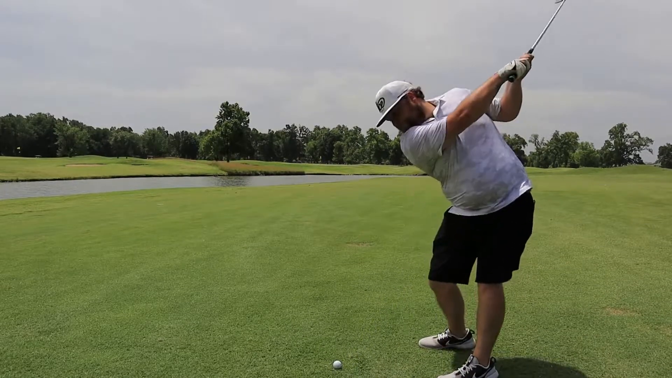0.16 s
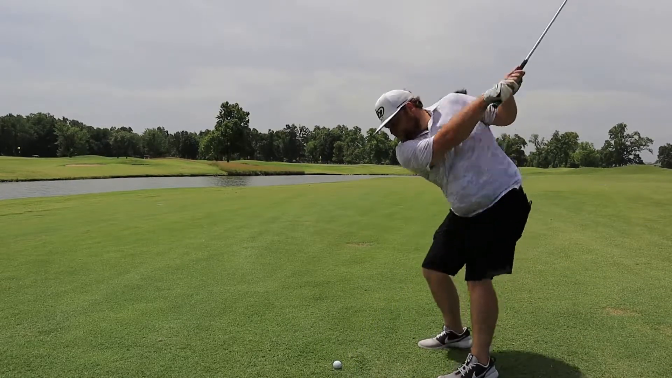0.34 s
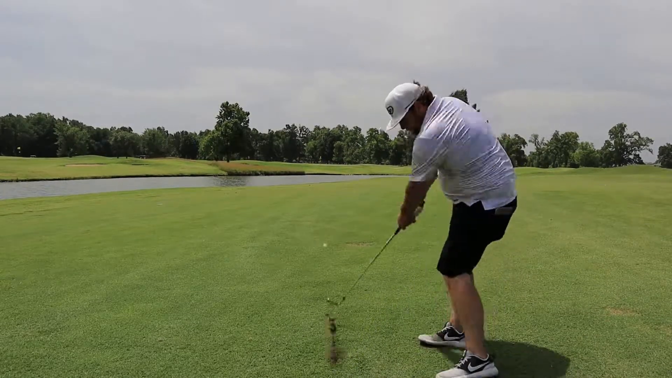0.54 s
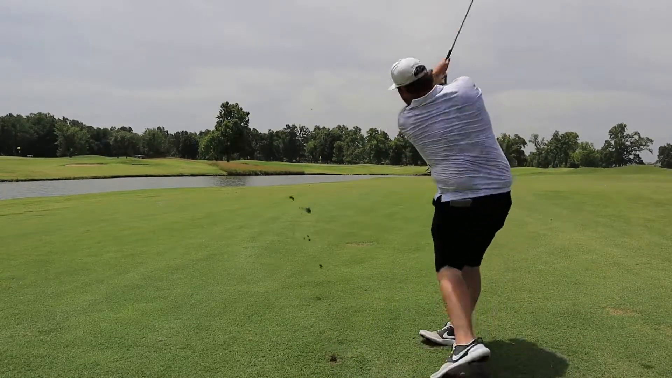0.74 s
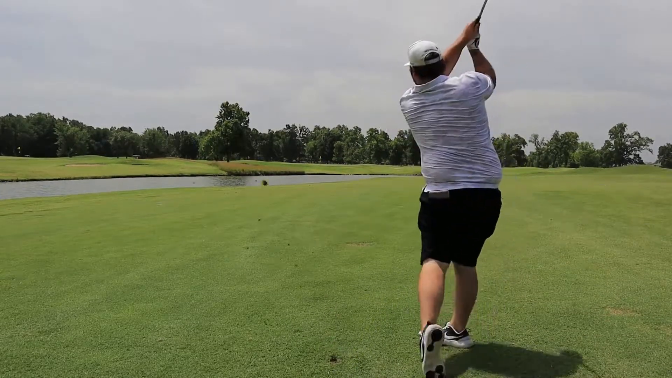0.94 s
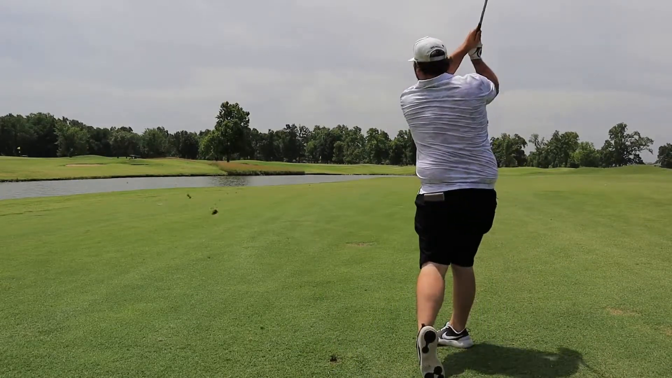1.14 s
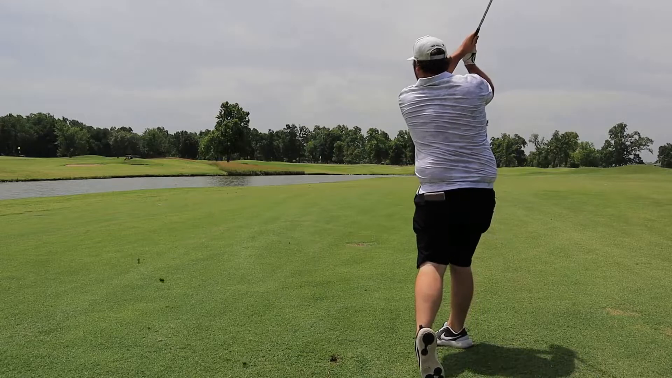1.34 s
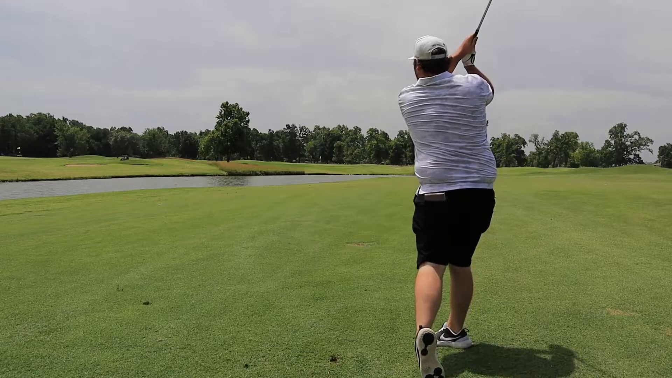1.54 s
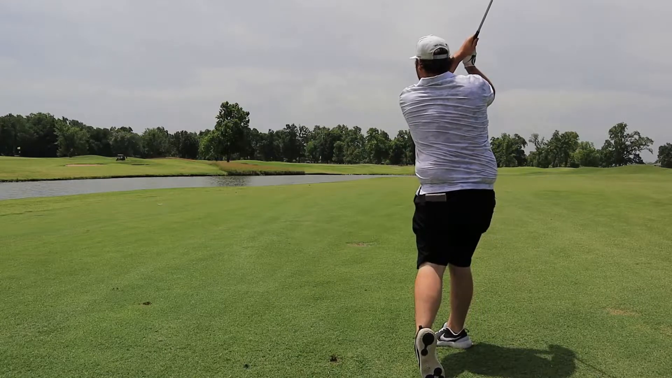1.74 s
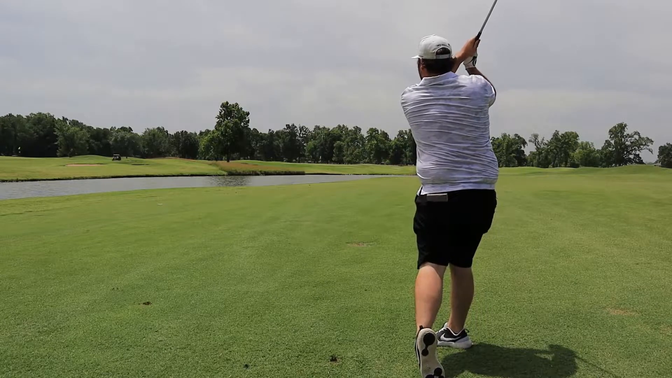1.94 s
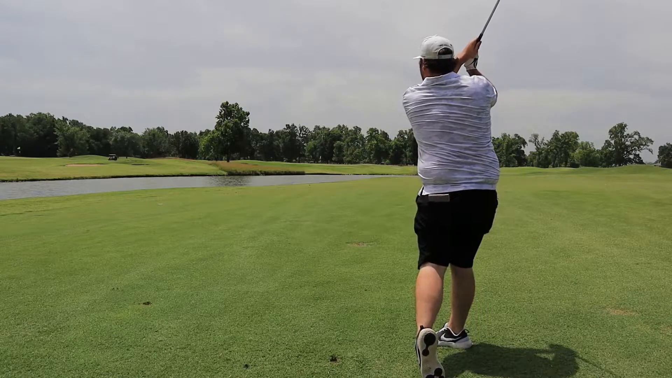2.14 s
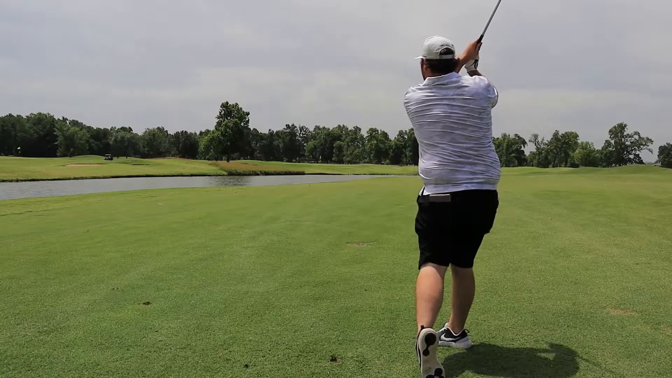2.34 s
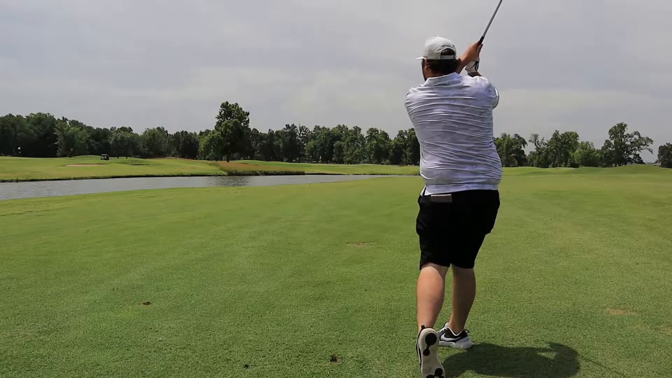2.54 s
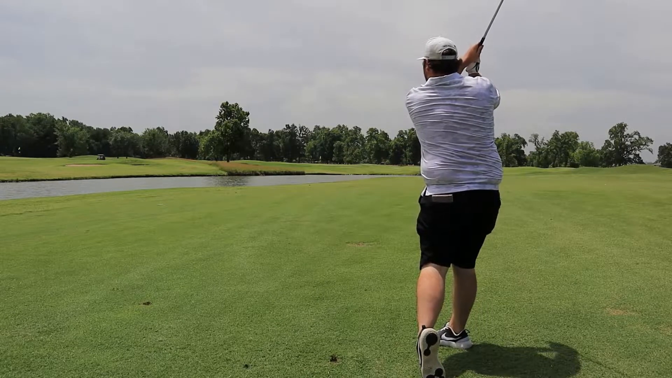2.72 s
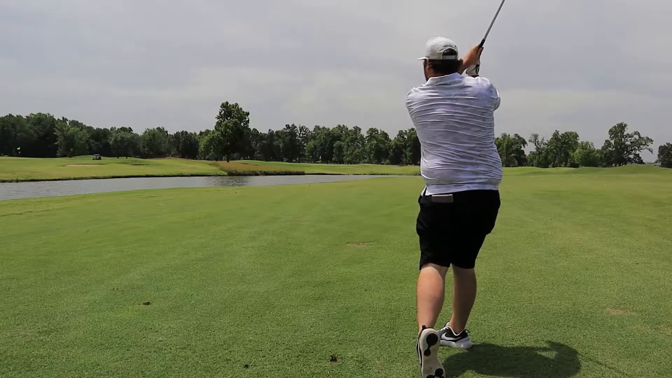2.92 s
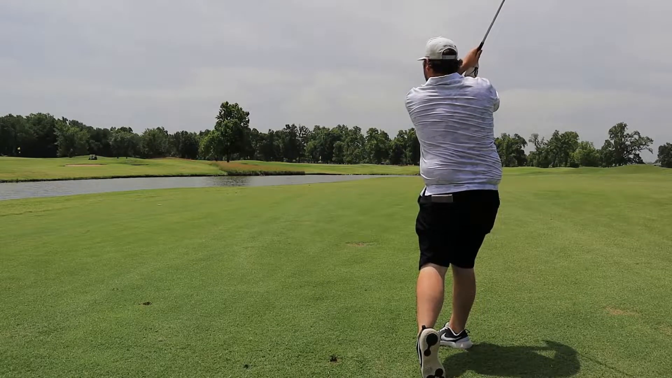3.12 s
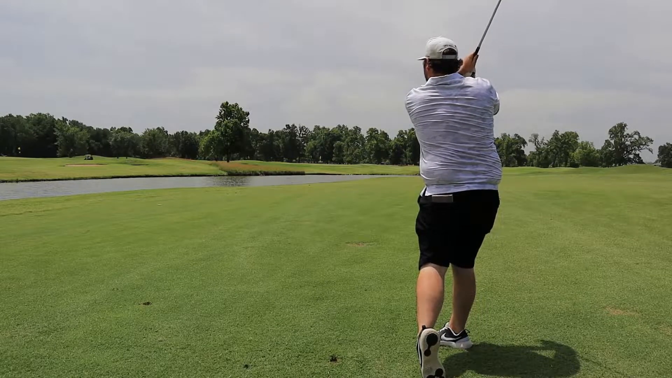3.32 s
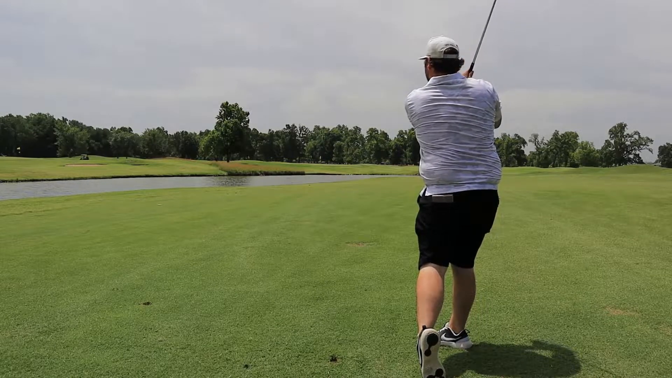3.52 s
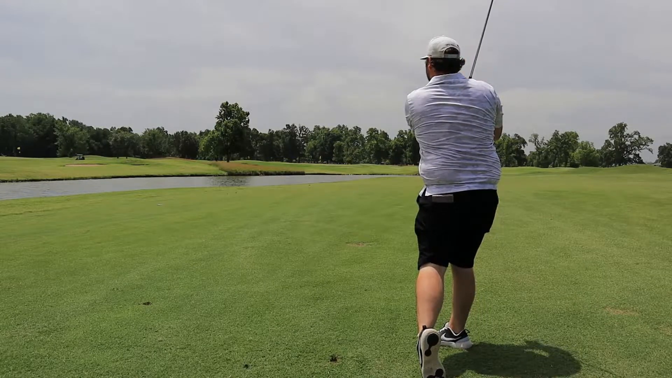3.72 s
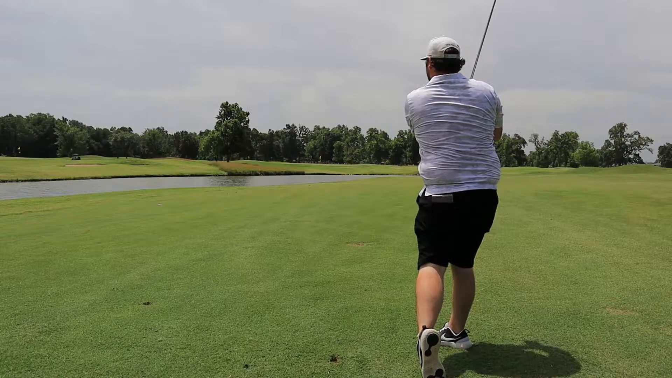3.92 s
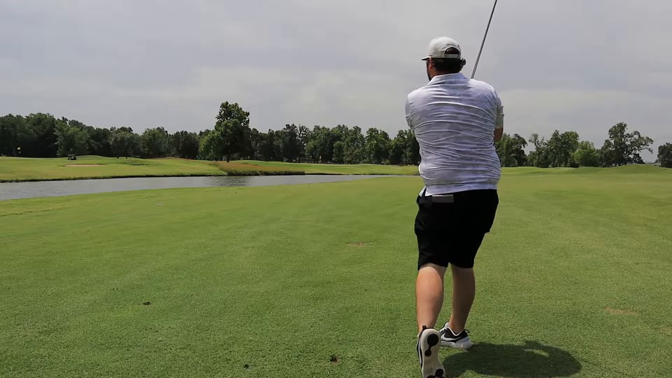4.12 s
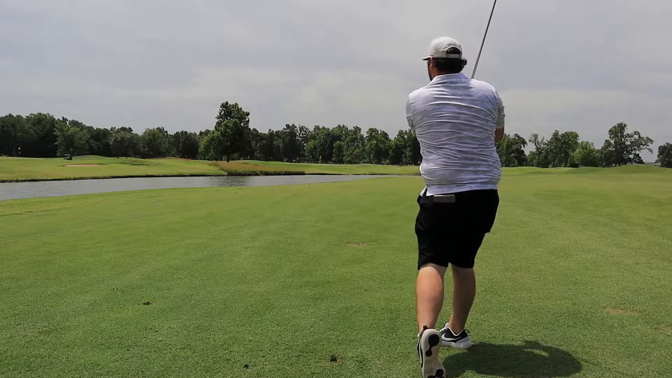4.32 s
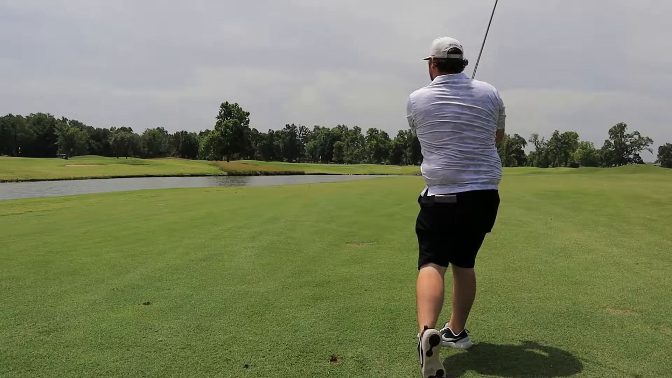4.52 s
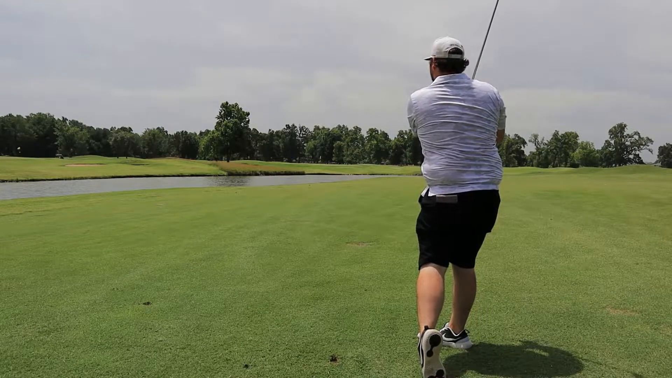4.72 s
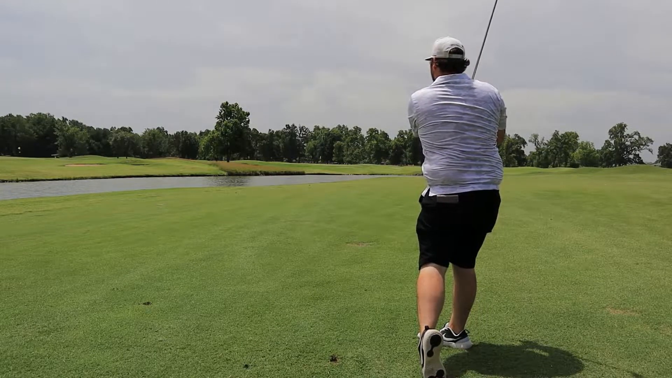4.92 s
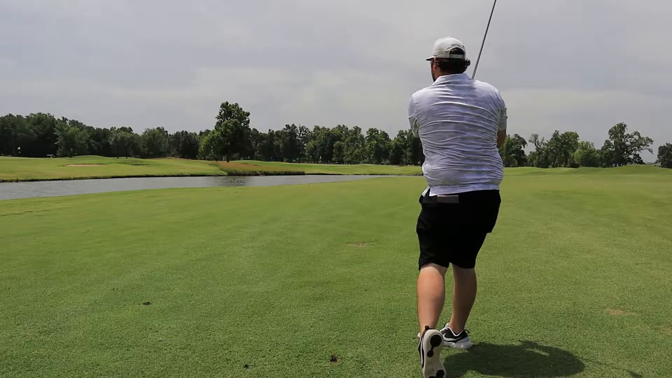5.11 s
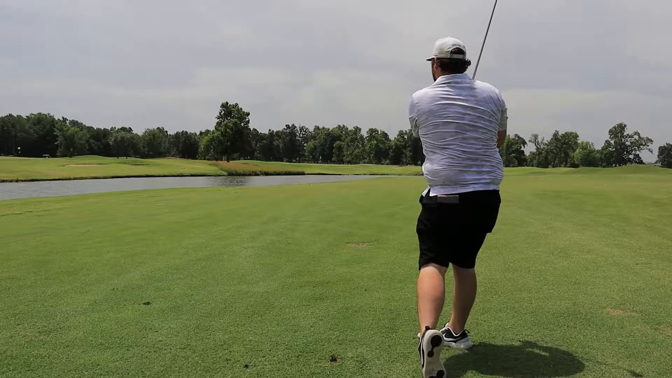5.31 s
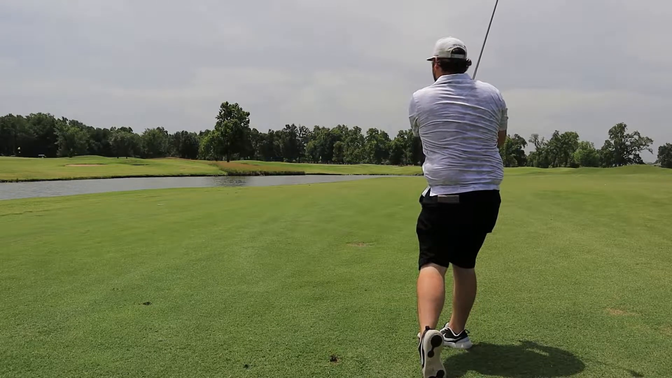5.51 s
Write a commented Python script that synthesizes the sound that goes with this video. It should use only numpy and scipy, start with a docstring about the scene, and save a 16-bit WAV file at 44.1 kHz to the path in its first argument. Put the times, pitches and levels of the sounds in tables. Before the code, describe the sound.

Quick whoosh, one loud clipped golf strike, then open fairway quiet with birdsong, soft wind rumble, far engine throb and a later small tick.

```python
"""Golf shot on a fairway

An iron swishes down, a hiss with rising fuzzy tones, and strikes a ball: short ringing tones and torn turf.
Behind it a far mower engine throbs as a stack of tones, under shaped noise for far roar and wind.
Birds whistle and chip as gliding tones, fainter ones as fluttering noise; cloth rustles as shaped noise.
About three seconds after the shot a small hard thing ticks nearby and rebounds."""
import sys
import numpy as np
from scipy import signal
from scipy.fft import rfft, irfft
from scipy.io import wavfile
from scipy.ndimage import uniform_filter1d

SR = 44100
rng = np.random.default_rng(int(sys.argv[2]) if len(sys.argv) > 2 else 0)


def materialize(psi):
    """Save the field psi as 16-bit PCM at rate SR to the path in sys.argv[1].

    A 1-D psi becomes a single channel; in a 2-D psi each row is a channel.
    """
    bounded = np.clip(np.atleast_2d(psi).T, -1, 1)
    quanta = np.round(bounded * 32767).astype(np.int16)
    wavfile.write(sys.argv[1], SR, quanta)


N = 249606  # length in samples
T = np.arange(N) / SR  # time in seconds

# In "colour" tables the level is relative; the finished noise is scaled to an overall strength of 1.
# "Likeness" runs from 0 (left and right unrelated) to 1 (the same). "Lean" is left minus right.

# Far roar, colour: f/Hz, level/dB
ROAR_COLOUR = [(60, -14), (110, -5), (190, -3.5), (280, -11), (480, -21.5), (750, -19), (1300, -22.5),
               (2100, -29.5), (3200, -32.5), (4500, -34), (6500, -37.5), (9000, -41.5), (12500, -42),
               (15900, -43.5)]
# Far roar, likeness: f/Hz, likeness/0-1
ROAR_LIKENESS = [(60, 0.73), (130, 1), (290, 0.16), (640, 0.64), (1400, 0.66), (3100, 0.32), (5500, 0.42),
                 (6800, 0.086), (7600, 0.99), (9000, 1), (15000, 1)]
# Far roar, lean: f/Hz, lean/dB
ROAR_LEAN = [(60, 6), (110, 0.5), (200, 0.5), (380, 3), (700, -3.0), (1290, -4), (2380, 2.0), (4400, 0.5),
             (8120, 0.5), (15000, -0.5)]
# Far roar, rise and fall of its middle range: t/s, level/dB
ROAR_SWELL = [(0, 1), (1.2, 1), (1.7, -.5), (2.2, 1), (2.7, -.5), (3.9, 0), (4.5, 2), (5.3, 0),
              (5.66, -2.5)]
ROAR_DB = -41.5

# Engine, how far firings fall behind a steady beat: t/s, lag/turns
FIRING_LAG = [(0, .13), (1.25, .14), (2.5, .09), (3.1, -.03), (3.75, -.1), (4.75, -.05), (5, .07),
              (5.66, .1)]
# Engine, tones of the exhaust before the left-right lean: multiple of the firing rate, level/dB
EXHAUST_TONES = [(3, -73), (4, -52.5), (5, -44.5), (6, -48.5), (7, -52), (8, -52), (9, -46.5), (10, -48.5),
                 (11, -54.5), (14, -58.5)]
FIRING_HZ = 21
RIGHT_DELAY_S = .0006

# Wind strength before random lumps: t/s, level/dB
WIND_GUSTS = [(0, -36.5), (.3, -30.5), (.55, -34), (.85, -31), (1.05, -39), (1.33, -33.5), (1.6, -40.5),
              (1.9, -37), (2.4, -32.5), (2.8, -46), (3.45, -48), (3.75, -44), (4.2, -51), (4.6, -43),
              (4.92, -37), (5.16, -36.5), (5.4, -38.5), (5.66, -34)]
# Wind, colour: f/Hz, level/dB
WIND_COLOUR = [(12, -35), (25, -9), (40, -2.5), (70, -5.5), (120, -14.5), (200, -21), (350, -26),
               (600, -81)]
# Wind, likeness: f/Hz, likeness/0-1
WIND_LIKENESS = [(20, 1.0), (45, 0.96), (80, 0.82), (200, 0.23)]
# Wind, lean: f/Hz, lean/dB
WIND_LEAN = [(20, -0.63), (200, -1.5)]
LUMP_DB, LUMPS_PER_S = 2, 8.3  # random buffeting

# Rough far bird chatter: t/s, level/dB, centre f/Hz, length/s
FAR_CHATTER = [(0.388, -59, 4000, 0.043), (1.232, -57, 5200, 0.065), (1.856, -55, 4200, 0.14),
               (2.521, -57, 4200, 0.056), (4.086, -57, 4100, 0.042), (4.524, -55.5, 4030, 0.085),
               (4.584, -55, 1940, 0.039), (4.6, -62, 3250, .03), (4.92, -57, 4800, .02),
               (5.432, -59, 5500, .04)]
# Bird whistles that hold a pitch, glide and hold again: t/s, length/s, level/dB, from f/Hz, to f/Hz,
# glide begins/0-1, glide ends/0-1, level change over the note/dB, left minus right/dB
WHISTLE_NOTES = [ (.05, 0.055, -60, 2815, 2770, 0, .9, -1, -8),
                 (.11, .155, -59, 2810, 2465, 0.18, 0.3, -2, -6),
                 (1.13, .05, -61, 3480, 3520, .1, .6, -4, 3),
                 (1.371, 0.026, -51, 5560, 5600, .1, .4, -8, 7),
                 (1.528, .08, -57.5, 2540, 2560, 0.4, .9, -6, 9),
                 (1.67, 0.19, -60.5, 2515, 2475, 0.16, 0.88, -11, 14),
                 (2.04, 0.026, -56, 4330, 4250, .4, .9, -1, -8),
                 (2.405, .25, -57.5, 3360, 2480, .57, .84, -2, 2),
                 (2.76, 0.11, -55, 3530, 3790, 0.1, 0.57, -2, 1),
                 (2.939, .113, -56, 2668, 2610, 0.2, 0.37, 3, 13.5),
                 (2.946, 0.14, -50.5, 2830, 1990, 0.13, 0.94, -12, 5),
                 (3.116, .17, -57.5, 2680, 2470, .01, .12, -6, 19),
                 (3.145, .08, -57.5, 3160, 2710, 0.33, .82, 2, 4),
                 (3.425, 0.033, -63, 4570, 4420, 0.4, .99, -2, 1),
                 (3.825, 0.028, -52, 2900, 3000, 0.1, 0.5, -4, 2),
                 (4.018, .03, -61, 4330, 4260, .4, .99, -6, -3),
                 (4.18, 0.056, -62, 3280, 2800, .1, .99, -4, 2.5),
                 (4.595, .03, -57, 3915, 3710, .01, 0.9, -5, -6),
                 (4.695, 0.15, -60, 2500, 2460, 0, .9, -7, -5),
                 (5.135, .07, -67.5, 3130, 2400, .01, 0.6, -1, -5),
                 (5.234, .18, -64.5, 2390, 2470, .5, 1, 1.5, 23.5),
                 (5.623, 0.041, -57.5, 5640, 5870, 0.3, .55, -1, -3)]
# Thin high calls that sag and flick up, one list a call: t/s, f/Hz
SEEP_PITCHES = [
    [(.67, 6000), (.8, 5900), (.824, 5914), (.846, 6485), (.875, 6060)],
    [(1.888, 6400), (1.96, 5900), (1.99, 5930), (2.02, 5860), (2.06, 5930), (2.08, 6300), (2.091, 6060),
     (2.11, 6350), (2.13, 5760)],
]
# Loudness of each thin call: opening level/dB, closing level/dB
SEEP_LOUDNESS = [(-64, -56), (-53.5, -55)]
# Chips whose pitch arches up and down: t/s, peak level/dB, top f/Hz
ARCHED_CHIPS = [(3.318, -53.5, 4770), (3.389, -47, 4760), (3.467, -40, 5000), (3.544, -42.5, 4550),
                (3.618, -38.5, 4940), (3.71, -47, 4530), (3.814, -49, 4720), (3.895, -43.5, 5080),
                (3.97, -45, 4570)]
# Quick pitch slides: t/s, peak level/dB, from f/Hz, to f/Hz, left minus right/dB, length/s
QUICK_SLIDES = [(1.238, -55, 7350, 6560, 11, .006), (1.239, -56, 3720, 3400, 2, 0.012),
                (1.26, -54, 7000, 5300, 7, 0.0038), (1.297, -52, 3400, 2800, 0, .005),
                (1.633, -49.5, 5660, 5000, 7, 0.0065), (1.697, -47.5, 5740, 4400, 7, 0.005),
                (1.708, -48, 4300, 2800, 2, 0.0044), (1.867, -48, 4860, 2590, -3, 0.0044),
                (1.9, -55, 5000, 4000, -2, .006), (2.145, -60, 3500, 2820, 0, 0.049),
                (2.208, -50, 4540, 3300, -5, .006), (3.385, -53, 5000, 6350, 7, 0.0125),
                (3.54, -47, 4770, 6100, 6, 0.0046), (3.556, -52, 6200, 5000, 6, 0.0061),
                (3.612, -52, 5000, 6100, 6, .006), (3.63, -55, 6100, 5200, 6, 0.0056),
                (4.677, -52.5, 6500, 4530, 0, 0.014), (4.97, -56, 8400, 5000, 0, 0.023),
                (5.281, -57, 6300, 5300, 3, .012)]
SWELL_S = 0.013  # a whistle opens and closes over this time
CHIP_S, CHIP_ARCH_HZ, CHIP_PAN_DB = 0.011, 850, 10

# Rubs of shirt and sleeves: t/s, peak level/dB
CLOTH_RUBS = [(.52, -53), (.65, -51)]
# Cloth, colour: f/Hz, level/dB
CLOTH_COLOUR = [(1500, -19), (3000, 9), (6000, -1.0), (9000, -0.5), (15000, -19.0)]
# Cloth, likeness: f/Hz, likeness/0-1
CLOTH_LIKENESS = [(3000, 0.68), (9000, 1.0)]
# Cloth, lean: f/Hz, lean/dB
CLOTH_LEAN = [(3000, 0), (9000, 0)]
RUB_RISE_DB_PER_S, RUB_FALL_DB_PER_S, RUB_TAIL_DB, RUB_END_S = 140, 150, -65.5, 1.3

# Tones of the small hard thing: f/Hz, level/dB, time to fall 60 dB/s
TICK_TONES = [(1350, -39, 0.022), (1950, -43, 0.017), (2720, -57, 0.0085), (3420, -28, 0.016),
              (3820, -32, 0.045), (3860, -24, 0.037), (4830, -46, 0.009), (7040, -41, .006),
              (11300, -33, .005)]
# A tick and its rebounds: t/s, level/dB, tilt/dB per octave
TICK_TOUCHES = [(3.474, 0, -0.5), (3.4783, 4.5, -14), (3.4798, -8, -4), (3.491, -17, 3)]

# Club swing: t/s, hiss level/dB, f/Hz of the eddies shed by the shaft
SWING_PATH = [(.38, -57, 150), (.5, -60, 200), (.56, -51, 240), (.6, -38, 400), (.636, -33.5, 670),
              (.645, -52, 620), (.67, -66, 495), (.72, -60, 350), (.9, -68, 200)]
# Swing hiss, colour: f/Hz, level/dB
SWISH_COLOUR = [(180, -31), (300, 3), (658, -17), (1370, -3.5), (2400, -9), (7180, -21), (7920, -24),
                (8600, -24), (15000, -38)]
# Swing hiss, likeness: f/Hz, likeness/0-1
SWISH_LIKENESS = [(300, 0.94), (15000, 0.76)]
# Swing hiss, lean: f/Hz, lean/dB
SWISH_LEAN = [(300, 1), (15000, -6.0)]

# Tones of club head and ball: f/Hz, level/dB, time to fall 60 dB/s
HEAD_TONES = [(363, -17, 0.021), (832, -12, 0.018), (1220, -19, 0.012), (1570, -6, 0.013),
              (2060, -11, 0.013), (2730, -10, 0.012), (3380, -2, 0.011), (3860, -13.5, 0.0085),
              (4290, -1, 0.0087), (5520, -12, 0.0073), (8000, -23, .008), (9300, -10, 0.0073),
              (11200, -28, .008), (13900, -25, .008)]
# The ball, then the sole skidding into turf: t/s, level/dB
HEAD_BLOWS = [(.6417, 0), (.6439, -9), (.6451, -11), (.6474, -13)]
# The ball flattening and springing back, then the dull thud of the ground:
# f/Hz, level/dB, time to fall 60 dB/s
SQUASH_AND_THUD = [(1380, -4.5, .006), (168, -26.5, 0.027)]
# Torn turf, colour: f/Hz, level/dB
TEAR_COLOUR = [(200, -5.5), (800, 6.5), (1800, -7.5), (3000, 0), (4300, -0.5), (6000, -8.5), (11000, -5.5),
               (15500, -24)]
# Fine soil and grass tips, colour: f/Hz, level/dB
SPRAY_COLOUR = [(6000, -20), (9000, -10), (12000, 2), (15500, 1)]
# Turf and soil, likeness: f/Hz, likeness/0-1
TURF_LIKENESS = [(300, 1.0), (2500, 0.81), (12000, 0.95)]
# Turf and soil, lean: f/Hz, lean/dB
TURF_LEAN = [(300, 2), (9000, -3.5)]
# Loose soil dropping back: t/s, level/dB, rise/dB per s, fall/dB per s
FALLING_CLODS = (.693, -48, 800, 800)
# The camera body turns the phase between its ports for the strike: f/Hz, left leads/radians
PORT_PHASE = [(300, .1), (3300, 0.16), (4500, 1.2), (5900, 1.6), (7000, 0.59), (8500, 0.46), (9500, 2.1),
              (10600, .6), (15000, 0.72)]
# The sole digs in, drags, lets go fast and leaves a slower crumble.
DIG_S, DIG_DB, BITE_DB_PER_S, DRAG_S, DRAG_DB = .642, -12, 19000, .0045, -3.5  # DRAG_DB: change over the drag
LET_GO_DB_PER_S, CRUMBLE_DB, CRUMBLE_DB_PER_S = 2900, -25.5, 1200
BRUSH_S, BRUSH_DB, BRUSH_RISE_DB_PER_S = .6415, -21, 5002  # the sole combs grass tips just before the ball
SPRAY_S, SPRAY_DB, SPRAY_HOLD_S, SPRAY_SAG_DB, SPRAY_EDGE_DB_PER_S = 0.646, -40, 0.021, -7, 3500

EDGE_HZ = 15880  # top of the sound


def gain_of(db):
    """Turns dB into a factor."""
    return 10 ** (np.asarray(db) / 20)


def evened(x):
    """Scales a sound to an overall (rms) strength of 1."""
    return x / np.sqrt(np.mean(x ** 2) + 1e-20)


def read(points, hz):
    """Reads a table between its points, on a log-frequency axis."""
    f, value = np.transpose(points)
    return np.interp(np.log(hz + 1), np.log(f + 1), value)


def curve(rows, t, axis=1):
    """Reads one column of a time table, joining its points by straight lines."""
    return np.interp(t, [r[0] for r in rows], [r[axis] for r in rows])


def peak(s, db, rise, fall):
    """A level in dB that climbs to db at time s and drops away, both in dB a second."""
    return db - np.where(T < s, rise * (s - T), fall * (T - s))


def plateau(s, db, hold_s, sag_db, rise, fall):
    """A level in dB that climbs, changes by sag_db over a hold, and drops away."""
    held = db + sag_db * np.clip((T - s) / hold_s, 0, 1)
    return held - rise * np.maximum(s - T, 0) - fall * np.maximum(T - s - hold_s, 0)


def add(mix, s, sound, pan_db):
    """Adds a sound at time s; pan_db is left minus right."""
    part = mix[:, round(s * SR):][:, :sound.shape[-1]]
    sides = gain_of(np.outer([.5, -.5], pan_db))
    part += (sides * sound)[:, :part.shape[1]]


def noise(colour, same, lean_db, patchy_db, size):
    """Two-channel noise of rms 1 from random short-time spectra with drifting patches."""
    hz = np.fft.rfftfreq(size, 1 / SR)
    a, b, c, d, patches = rng.standard_normal((4 * N // size + 5, len(hz), 5)).T
    # Smoothing over pitch, then over time, makes the patches drift.
    patches = uniform_filter1d(patches, size=9, axis=0)
    patches = evened(uniform_filter1d(patches, size=12, axis=1))
    same = np.clip(read(same, hz), -1, 1)[:, None]
    left = a + 1j * b
    right = same * left + np.sqrt(1 - same ** 2) * (c + 1j * d)
    lean = read(lean_db, hz)[:, None] / 2
    level = read(colour, hz)[:, None] + patchy_db * patches
    spectra = np.array([left, right]) * gain_of(level + np.array([lean, -lean]))
    return evened(signal.istft(spectra, nperseg=size, noverlap=3 * size // 4)[1][:, :N])


def resonate(x, hz, width):
    """A resonance of gain 1: shifts the pitch curve hz down to zero, smooths, and shifts back."""
    turn = np.exp(2j * np.pi * np.cumsum(hz) / SR)
    r = np.exp(-np.pi * width / SR)  # width in Hz
    return 2 * (turn * signal.lfilter([1 - r], [1, -r], x / turn)).real


def ring(modes, tilt_db, contact_s):
    """The tones of a struck body build up while the contact lasts, then die."""
    t = np.arange(4000) / SR
    tones = 0
    for hz, db, t60 in modes:
        level = db + tilt_db * np.log2(hz / 2000) - 60 * t / t60
        tones = tones + gain_of(level) * np.sin(2 * np.pi * hz * t)
    return tones * (1 - np.exp(-t / contact_s))


def air():
    """The far roar of machines and trees with microphone hiss on top; its middle range swells."""
    steady = noise(ROAR_COLOUR, ROAR_LIKENESS, ROAR_LEAN, patchy_db=1.12, size=1024)
    band = signal.butter(2, [450, 2200], "band", fs=SR, output="sos")
    middle = signal.sosfiltfilt(band, steady)
    extra = gain_of(curve(ROAR_SWELL, T)) - 1
    return gain_of(ROAR_DB) * (steady + middle * extra)


def engine():
    """One thump a firing, uneven in strength; it reaches the right microphone a little later."""
    turns = FIRING_HZ * (T - np.array([[0], [RIGHT_DELAY_S]])) - curve(FIRING_LAG, T)
    thumps = 0
    for k, db in EXHAUST_TONES:
        thumps = thumps + np.sqrt(2) * gain_of(db) * np.cos(2 * np.pi * round(k) * turns - 1.7)
    # One random strength a firing, joined by straight lines.
    uneven = np.interp(turns[0], np.arange(-2, 130) + .5, rng.standard_normal(132))
    lean_db = np.array([[-1.2], [1.2]])
    return thumps * gain_of(1.7 * uneven + lean_db)


def wind():
    """Lumpy air pressure on the microphone ports, heard as a low rumble."""
    lumps = np.interp(T * LUMPS_PER_S, np.arange(100), rng.standard_normal(100))
    rumble = noise(WIND_COLOUR, WIND_LIKENESS, WIND_LEAN, patchy_db=-1.5, size=4096)
    return gain_of(curve(WIND_GUSTS, T) + LUMP_DB * lumps) * rumble


def note(hz, rough):
    """A near sine that flutters in level (by about rough dB) and wavers in pitch."""
    random = rng.standard_normal((2, len(hz)))
    flutter, waver = uniform_filter1d(random, size=150) * np.sqrt(150)
    turns = np.cumsum(hz * (1 + 0.0072 * waver)) / SR
    return gain_of(rough * flutter) * np.sin(2 * np.pi * turns)


def whistle(hz, start_db, end_db):
    """A note that opens, drifts from one level to another and closes."""
    t = np.arange(len(hz)) / SR
    edges = np.clip(np.minimum(t, t[::-1]) / SWELL_S, 0, 1)
    level = np.sqrt(2) * gain_of(np.linspace(start_db, end_db, len(t)))
    smooth_hz = uniform_filter1d(hz, size=200, mode="nearest")
    return edges * level * note(smooth_hz, 1.7)


def twitter():
    """Many faint far chirps at random moments, pitches and sides."""
    out, u = np.zeros((2, N)), np.linspace(0, 1, 500)
    for s, pitch, glide, size, side in rng.random((120, 5)):
        hz = 2300 * 2.6 ** pitch * (1 + .5 * (glide - .7) * u)
        level = gain_of(-68 + 7 * size)
        chirp = level * note(hz, 2.5) * np.sin(np.pi * u)
        add(out, s * N / SR, chirp, 12 * (side - .5))
    return out


def chatter():
    """Birds too far to keep a pitch: fluttering noise passed twice through one resonance."""
    out = np.zeros((2, N))
    for s, db, hz, length in FAR_CHATTER:
        count = round(length * SR)
        raw, centre = rng.standard_normal((2, count)), np.full(count, hz)
        rough = resonate(resonate(raw, centre, 700.), centre, 700.)
        add(out, s, gain_of(db) * evened(rough) * np.hanning(count), -1.5)
    return out


def birds():
    """Small birds sing moving tones: gliding whistles, thin high calls, arched chips, quick slides."""
    out = np.zeros((2, N))
    for s, length, db, start_hz, end_hz, begin, end, fade_db, pan_db in WHISTLE_NOTES:
        u = np.linspace(0, 1, round(length * SR))
        glide = np.clip((u - begin) / max(end - begin, .02), 0, 1)
        hz = start_hz + (end_hz - start_hz) * glide
        add(out, s, whistle(hz, db, db + fade_db), pan_db)
    for rows, levels in zip(SEEP_PITCHES, SEEP_LOUDNESS):
        t = np.arange(rows[0][0], rows[-1][0], 1 / SR)
        add(out, t[0], whistle(curve(rows, t), *levels), -.4)
    u = np.linspace(-1, 1, round(CHIP_S * SR))
    for s, db, hz in ARCHED_CHIPS:
        chip = note(hz - CHIP_ARCH_HZ * u ** 2, 0.81) * (1 - u ** 2)
        add(out, s, gain_of(db) * chip, CHIP_PAN_DB)
    for s, db, start_hz, end_hz, pan_db, length in QUICK_SLIDES:
        hz = np.geomspace(start_hz, end_hz, round(length * SR))
        slide = note(hz, 2.2) * signal.windows.tukey(len(hz), .6)
        add(out, s, gain_of(db) * slide, pan_db)
    return out


def field(x):
    """Faint scattered echoes from ground and trees: sparse taps of random sign, dying fast."""
    taps = np.zeros((2, 8000))
    at = np.arange(200, 7980, 20) + rng.integers(0, 20, (2, 389))
    np.put_along_axis(taps, at, rng.choice([-1., 1.], at.shape), 1)
    taps *= gain_of(-60 * np.arange(8000) / SR / 0.26)  # falls 60 dB in 0.26 s
    return signal.fftconvolve(x, taps / np.linalg.norm(taps[0]), axes=1)[:, :N]


def rustle():
    """Cloth rubs twice as the body turns, then settles."""
    cloth = noise(CLOTH_COLOUR, CLOTH_LIKENESS, CLOTH_LEAN, patchy_db=2.2, size=256)
    rubs = np.max([peak(s, db, RUB_RISE_DB_PER_S, RUB_FALL_DB_PER_S) for s, db in CLOTH_RUBS], axis=0)
    last_s = CLOTH_RUBS[-1][0]
    fade = np.clip((RUB_END_S - T) / (RUB_END_S - last_s), 0, 1)
    settling = gain_of(RUB_TAIL_DB) * (T > last_s) * fade
    return (gain_of(rubs) + settling) * cloth


def tick():
    """A small hard thing is tapped and rebounds; each touch rings and gives a short noisy snap."""
    out, t = np.zeros((2, N)), np.arange(1500) / SR
    for s, db, tilt_db in TICK_TOUCHES:
        add(out, s, gain_of(db) * ring(TICK_TONES, tilt_db, 0.00012), -2.5)
        snap = uniform_filter1d(rng.standard_normal(len(t)), size=3)
        snap_db = db + 1.3 * tilt_db - 30 - 60 * t / 0.035
        add(out, s, gain_of(snap_db) * snap, -1.5)
    return out


def swing():
    """Eddies behind shaft and head: hiss and fuzzy tones that brighten and rise with the club's speed."""
    hiss = noise(SWISH_COLOUR, SWISH_LIKENESS, SWISH_LEAN, patchy_db=0.5, size=256)
    hz, raw = curve(SWING_PATH, T, axis=2), rng.standard_normal(N)
    # The higher the eddy pitch, the more treble is left in the hiss.
    dull = signal.lfilter(*signal.butter(1, 2500, fs=SR), hiss)
    hiss = dull + (hiss - dull) * np.clip(hz / 650, 0, 1) ** 0.69
    tones = evened(resonate(raw, hz, 60.0)) + 0.51 * evened(resonate(raw, 2 * hz, 110.0))
    moving = (T > SWING_PATH[0][0]) * (T < SWING_PATH[-1][0])
    return gain_of(curve(SWING_PATH, T)) * (hiss + tones) * moving


def blows():
    """The head rings at each blow; at the first the ball squashes and the ground thuds."""
    out = np.zeros((2, N))
    for s, db in HEAD_BLOWS:
        add(out, s, gain_of(db) * ring(HEAD_TONES, 0, 0.00015), -2.2)
    add(out, HEAD_BLOWS[0][0], ring(SQUASH_AND_THUD, 0, 0.0001), -1.5)
    return out


def torn_turf():
    """Turf tears as the sole digs and drags, crumbles after it, and loose clods drop back."""
    dig = plateau(DIG_S, DIG_DB, DRAG_S, DRAG_DB, BITE_DB_PER_S, LET_GO_DB_PER_S)
    crumble = peak(DIG_S + DRAG_S, CRUMBLE_DB, BITE_DB_PER_S, CRUMBLE_DB_PER_S)
    level = gain_of(dig) + gain_of(crumble) + gain_of(peak(*FALLING_CLODS))
    return level * noise(TEAR_COLOUR, TURF_LIKENESS, TURF_LEAN, patchy_db=-0.5, size=128)


def grass_and_spray():
    """A high hiss as the sole brushes the grass tips, then as fine soil sprays."""
    brush = peak(BRUSH_S, BRUSH_DB, BRUSH_RISE_DB_PER_S, BITE_DB_PER_S)
    spray = plateau(SPRAY_S, SPRAY_DB, SPRAY_HOLD_S, SPRAY_SAG_DB, SPRAY_EDGE_DB_PER_S, SPRAY_EDGE_DB_PER_S)
    hiss = noise(SPRAY_COLOUR, TURF_LIKENESS, TURF_LEAN, patchy_db=2.2, size=128)
    return hiss * (gain_of(brush) + gain_of(spray))


def ports(x):
    """The camera body shifts timing between its ports: left and right each turn half the phase."""
    phase = read(PORT_PHASE, np.fft.rfftfreq(N, 1 / SR))
    turn = np.exp(.5j * np.outer([1, -1], phase))
    return irfft(rfft(x) * turn, N)


def strike():
    """Club meets ball and ground: ringing blows, tearing turf and sprayed soil reach the ports."""
    return ports(blows() + torn_turf() + grass_and_spray())


def scene():
    """All sources on the fairway, with faint echoes of the birds, strike and tick."""
    song = twitter() + chatter() + birds()
    near = tick() + strike()
    echoes = field(gain_of(-34.0) * near + gain_of(-13.5) * song)
    return air() + engine() + wind() + song + echoes + rustle() + swing() + near


def record(dry):
    """The input overloads, cutting peaks flat at 0.94; then a low-pass removes the highest treble."""
    clipped = np.clip(dry, -.94, .94)
    low_pass = signal.firwin(511, EDGE_HZ, window=("kaiser", 9), fs=SR)
    return signal.oaconvolve(clipped, low_pass[None], "same")


dry = scene()
out = record(dry)
materialize(out)
```